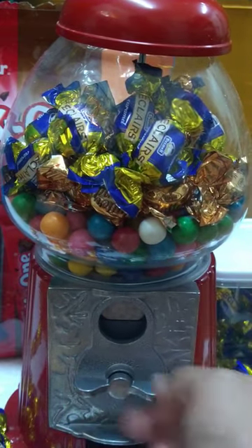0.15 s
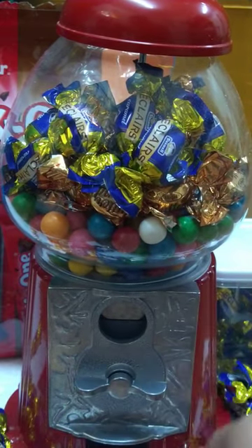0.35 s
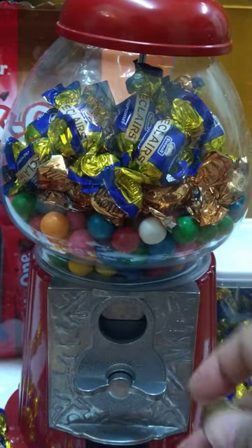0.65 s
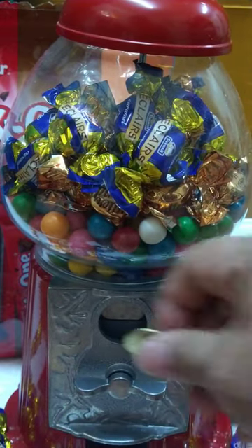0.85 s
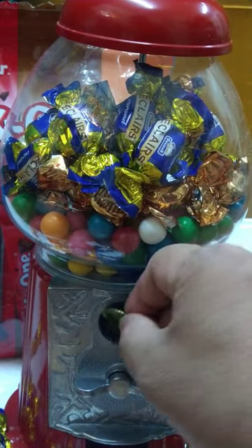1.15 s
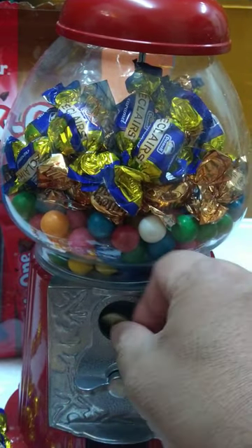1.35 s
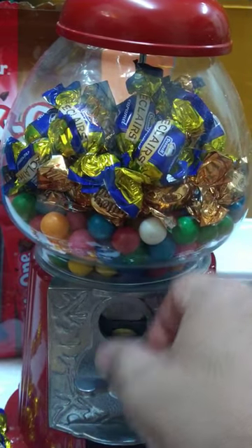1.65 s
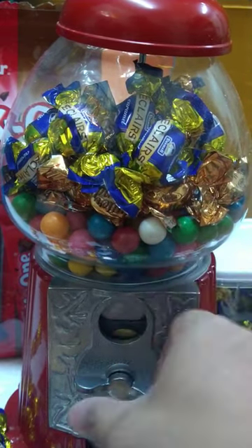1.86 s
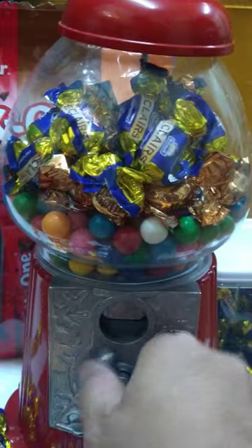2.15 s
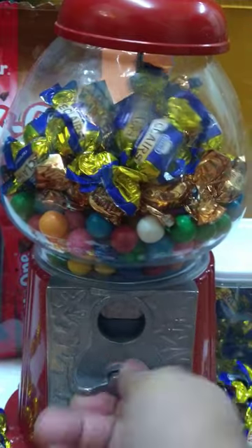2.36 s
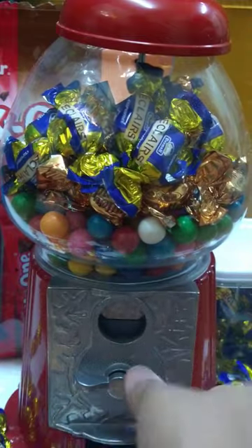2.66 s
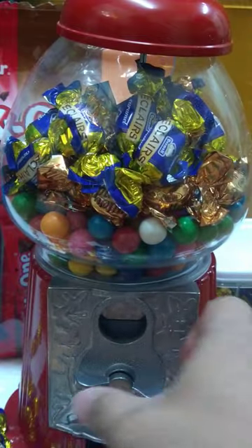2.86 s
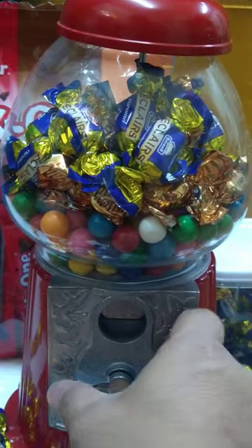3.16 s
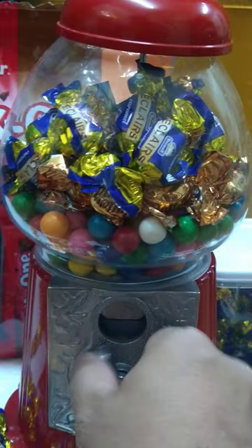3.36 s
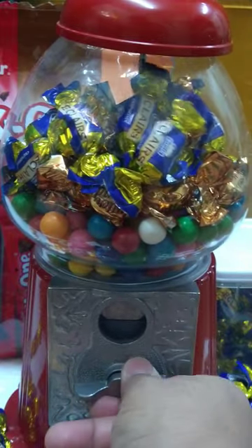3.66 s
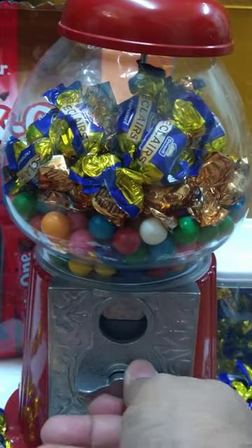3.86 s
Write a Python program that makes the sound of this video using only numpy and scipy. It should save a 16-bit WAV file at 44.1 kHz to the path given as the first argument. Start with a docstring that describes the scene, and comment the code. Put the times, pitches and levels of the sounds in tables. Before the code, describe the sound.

A gumball machine, close in a quiet room with low ventilation rumble and faint hiss. A hard metal clack opens at 0 s, then near quiet. Faint coin touches from 1.3 s become a bright scrape at 1.55; light ticks follow. Dense ratcheting clacks and grinding run 2.35-2.7, a short squeak at 2.8, sweets clattering 2.94-3.15, more clacks 3.4-3.7, then the coin drops at 3.8 with quickening, fading bounces.

```python
"""A hard metal clack over low ventilation rumble and faint hiss: a gumball machine, close by in a quiet room.
A coin scrapes into the slot and the knob is turned twice; pawl and wheel clack, sweets tumble on the globe.
At the end the coin falls into the base and bounces to rest. Contacts are filtered noise bursts with dying
modes, the grind is many tiny slips and the squeaks are rough two-harmonic chirps, all with a short room tail.
Two microphones hear the bass much alike and the treble differently."""
import sys
import numpy as np
from scipy import signal
from scipy.fft import rfft, irfft
from scipy.io import wavfile
from scipy.ndimage import uniform_filter1d

SR = 44100
rng = np.random.default_rng(int(sys.argv[2]) if len(sys.argv) > 2 else 0)


def int16_out(signal):
    """Quantize to a 16-bit WAV file."""
    q = np.round(np.clip(np.atleast_2d(signal).T, -1, 1) * 32767)
    wavfile.write(sys.argv[1], SR, q.astype(np.int16))


N = 176400


def amp(db):
    """Decibels to gain."""
    return 10 ** (np.asarray(db) / 20)


def evened(x):
    """Scales to rms 1."""
    return x / np.sqrt(np.mean(x ** 2) + 1e-20)


def read(points, hz):
    """Reads a table on a log-frequency axis."""
    f, value = np.transpose(points)
    return np.interp(np.log(hz + 1), np.log(f + 1), value)


def level_curve(points):
    """Gain over the whole scene, from a table of times and levels."""
    return amp(np.interp(np.arange(N) / SR, *np.transpose(points)))


def dying(t, t60):
    """Falls 60 dB in t60 seconds."""
    return np.exp(-np.log(1000) * t / t60)


def add(mix, s, sound):
    """Mixes a stereo sound in at time s."""
    part = mix[:, max(round(s * SR), 0):][:, :sound.shape[1]]
    part += sound[:, :part.shape[1]]


def microphones(x, likeness):
    """Two microphones hear the two sides mixed more or less alike, depending on frequency."""
    a, b = rfft(x)
    c = np.clip(read(likeness, np.fft.rfftfreq(N, 1 / SR)), -1, 1)
    mid = (a + b) * np.sqrt(1 + c) / 2
    side = (a - b) * np.sqrt(1 - c) / 2
    return irfft(np.array([mid + side, mid - side]), N)


# Spectrum of the room's rumble and hiss, before its overall level: (frequency [Hz], density [dB per Hz])
AIR_COLOUR = [(35,-35),(55,-19.5),(75,-12),(92,-3),(116,2),(140,-13),(450,-17),(720,-24.5),(1900,-33.5),(4500,-44),(9000,-41),(16000,-54)]
# Likeness of the air at the two microphones: (frequency [Hz], likeness [-1 to 1])
AIR_LIKENESS = [(100,1),(400,0.35)]
AIR_DB, AIR_SWELL_DB = -51.5, .6  # level, and rms depth of its slow swell


def air():
    """Ventilation rumble with a slow swell, under faint hiss: shaped steady noise."""
    hz = np.fft.rfftfreq(N, 1 / SR)
    noise = irfft(rfft(rng.standard_normal((2, N))) * amp(read(AIR_COLOUR, hz)), N)
    swell = evened(irfft(rfft(rng.standard_normal(N)) * np.exp(-(hz / 4) ** 2), N))
    return amp(AIR_DB + AIR_SWELL_DB * swell) * evened(microphones(noise, AIR_LIKENESS))


# The stand rumbling under the hand: (time [s], level [dB])
STAND_LEVEL = [(1.299,-62),(2.7,-51.5)]
STAND_HZ = 90  # centre of the rumble


def stand():
    """The hand's pushing shakes the stand: a low band of noise, alike at both microphones."""
    hz = np.fft.rfftfreq(N, 1 / SR)
    band = np.exp(-2 * np.log2((hz + 1) / STAND_HZ) ** 2)
    return evened(irfft(rfft(rng.standard_normal(N)) * band, N)) * level_curve(STAND_LEVEL)


# Decay of the room around the machine: (frequency [Hz], t60 [s])
ROOM_T60 = [(200,0.66),(4000,0.15),(9000,0.17),(15000,.16)]
ROOM_DB, ROOM_RISE_S = -11.5, 0.0048


def room(x):
    """A short diffuse tail: noise whose bass outlasts its treble."""
    hz, t, z = signal.stft(rng.standard_normal((2, SR // 2)), SR, nperseg=256)
    tail = signal.istft(z * dying(t, read(ROOM_T60, hz)[:, None]), SR)[1]
    tail = tail * np.minimum(np.arange(tail.shape[1]) / SR / ROOM_RISE_S, 1) ** 2
    return amp(ROOM_DB) * signal.fftconvolve(x, tail / np.linalg.norm(tail[0]), axes=1)[:, :N]


RIPPLE_DB, RIPPLE_WIDTH_HZ = 3.6, 220


def spot(size=2048):
    """The short resonances favoured by one point of contact, in dB over frequency."""
    lag = np.arange(size) / SR
    echoes = rng.standard_normal(size) * lag * np.exp(-(lag * RIPPLE_WIDTH_HZ * 2) ** 2)
    return RIPPLE_DB * evened(np.fft.fft(echoes).real)


BASS_SHELF_HZ, TREBLE_SHELF_HZ = 2900, 9000


def bass_shelf(hz):
    """Share of a bass boost or cut that reaches each frequency."""
    return 1 / (1 + (hz / BASS_SHELF_HZ) ** 3)


def coloured(x, colour, bass_db=0, treble_db=0, ripple=0, size=2048):
    """Causal filter of unit power with a spectrum, two shelves and a ripple of resonances."""
    hz = abs(np.fft.fftfreq(size, 1 / SR))
    treble_shelf = 1 - 1 / (1 + (hz / TREBLE_SHELF_HZ) ** 4)
    gain = evened(amp(read(colour, hz) + ripple + bass_db * bass_shelf(hz) + treble_db * treble_shelf))
    # Minimum phase puts the energy at the very start of the sound
    minimum_phase = np.exp(np.conj(signal.hilbert(np.log(gain + 1e-6))))
    taps = np.fft.ifft(minimum_phase).real[:size // 2]
    return signal.fftconvolve(x, taps[None], axes=1)[:, :x.shape[1]]


RING_SPREAD_DB = 4.5  # random spread of each mode's level at each microphone
FAVOUR_DB, FAVOUR_WIDTH_HZ = 9, 150  # a point of contact can drive the modes near one frequency harder
DETUNE_SHARE = .007  # the load on the parts shifts the modes from blow to blow


def ring(modes, t60, t, bass_db=0, favoured_hz=0):
    """Dying modes, excited a little differently by each blow and heard differently on each side."""
    hz, db = np.transpose(modes)[:, :, None]
    shape = (2, len(modes))
    phase = np.exp(2j * np.pi * rng.random(shape))
    size = amp(RING_SPREAD_DB * rng.standard_normal(shape)) * phase
    favour = FAVOUR_DB * np.exp(-((hz - favoured_hz) / FAVOUR_WIDTH_HZ) ** 2)
    db = db + bass_db * bass_shelf(hz) + favour
    hz = hz * (1 + DETUNE_SHARE * rng.standard_normal(hz.shape))
    return (size @ (amp(db) * np.exp((2j * np.pi * hz - np.log(1000) / t60) * t))).real


GRIT_DB, GRIT_HZ, GRIT_START_S = 1.6, 400, .012  # rms depth, fastest change, time to full depth


def chatter(t):
    """Loose parts make and break contact, so the tail of a blow is uneven."""
    slow = np.fft.rfftfreq(len(t), 1 / SR) < GRIT_HZ
    grit = irfft(rfft(rng.standard_normal(len(t))) * slow, len(t))
    return amp(GRIT_DB * evened(grit) * np.minimum(t / GRIT_START_S, 1))


# A contact swells, dies fast and leaves a short rattle; all but the rise are stretched by "length"
RISE_S, HOLD_S, CRACK_T60_S, RATTLE_T60_S, RATTLE_DB = .0026, 0.0034, 0.023, 0.088, -2
BRIGHT_DB_PER_DB = 0.64  # softer blows have less treble than the hardest of their kind
TREBLE_PER_BASS = -0.24  # a blow with less bass is also brighter


def strikes(rows, colour, modes, t60, ring_db, length, alike, favoured_hz=0):
    """Hard contacts: a crack of dense resonances, partly the same each time, and a few longer modes."""
    out, t = np.zeros((2, N)), np.arange(SR // 5) / SR
    rise = np.minimum(t / RISE_S, 1) ** 2
    crack_fall = dying(np.maximum(t / length - HOLD_S, 0), CRACK_T60_S)
    rattle_fall = amp(RATTLE_DB) * dying(t / length, RATTLE_T60_S)
    envelope = rise * np.hypot(crack_fall, rattle_fall)
    shared = rng.standard_normal((2, len(t)))
    hardest = max(row[1] for row in rows)

    def blow(db, bass_db=0, hz=favoured_hz):
        """One contact, from its level, bass and favoured frequency."""
        dense = np.sqrt(alike) * shared + np.sqrt(1 - alike) * rng.standard_normal(shared.shape)
        treble_db = BRIGHT_DB_PER_DB * (db - hardest) + TREBLE_PER_BASS * bass_db
        ripple = np.sqrt(1 - alike) * spot()
        crack = coloured(dense * envelope * chatter(t), colour, bass_db, treble_db, ripple)
        return amp(db) * (crack + amp(ring_db) * rise * ring(modes, t60, t, bass_db, hz))

    for s, *contact in rows:
        add(out, s - RISE_S / 2, blow(*contact))
    return out


# Ringing of the cast housing, shared by the grind and most contacts: (frequency [Hz], level [dB])
HOUSING = [(1610,-23),(1960,-16),(2600,-16),(2855,-18.5),(3540,-18.5),(3895,-21),(4160,-19.5),(4745,-16),(5615,-13),(6320,-21),(7235,-16),(8175,-19),(9925,-23.5)]
HOUSING_T60_S = 0.054
# Level of the rubbing as the knob is handled and the wheel grinds round: (time [s], level [dB])
GRIND_LEVEL = [(.05,-55.5),(.25,-58),(.32,-64),(1.44,-78),(1.53,-55.5),(1.7,-63.5),(2.15,-65.5),(2.28,-41.5),(2.345,-39.5),(2.75,-42),(2.79,-58.5),(2.92,-65),(3.059,-30),(3.19,-55),(3.388,-61),(3.46,-45),(3.7,-42.5),(3.8,-66)]
# Colour of the rubbing, also used in the squeaks: (frequency [Hz], density [dB per Hz])
GRIND_COLOUR = [(100,-33),(300,6),(600,-7.5),(1900,-1),(8000,-4.5),(11000,-9.5),(16000,-33.5)]
SLIPS_PER_S, SLIP_SPREAD_DB = 540, 3.5  # over all points together


def grinding(points=6):
    """Tiny slips of the wheel under the sweets, at several points of the housing."""
    t, sound = np.arange(SR // 10) / SR, 0
    for _ in range(points):
        size = amp(SLIP_SPREAD_DB * np.minimum(rng.exponential(1, N), 3))
        slips = (rng.random(N) < SLIPS_PER_S / points / SR) * size * rng.choice([-1, 1], N)
        burst = rng.standard_normal((2, len(t))) * np.exp(-t / 0.0046)
        grain = coloured(burst, GRIND_COLOUR, ripple=spot())
        grain = grain + amp(-3.5) * ring(HOUSING, HOUSING_T60_S, t, bass_db=17)
        sound = sound + signal.fftconvolve(slips[None], grain, axes=1)[:, :N]
    return evened(sound) * level_curve(GRIND_LEVEL)


# Hollow knocks of the base: (time [s], frequency [Hz], level [dB], t60 [s])
KNOCKS = [(2.592, 302, -31.5, 0.078), (2.9435, 754, -26.5, 0.016)]


def base_knocks():
    """Hollow knocks of the base: single dying sines, before the room the same on both sides."""
    out, t = np.zeros((2, N)), np.arange(SR // 8) / SR
    for s, hz, db, t60 in KNOCKS:
        envelope = amp(db) * np.minimum(t / 0.0037, 1) * dying(t, t60)
        add(out, s, np.ones((2, 1)) * envelope * np.sin(2 * np.pi * hz * t))
    return out


# Short squeaks of the turning shaft: (time [s], level [dB])
SQUEAKS = [(2.799,-33),(2.819,-29.5),(2.845,-24.5),(2.868,-36.5)]
SQUEAK_HZ, SQUEAK_WOBBLE_HZ = 1989, 94  # fundamental, and rms wander of its pitch
SQUEAK_S, SQUEAK_LOW_DB = 0.014, -4  # swell peaks at half this time; fundamental against second harmonic


def shaft_squeaks():
    """Rough stick-slip chirps of two harmonics with a little noise."""
    out, t = np.zeros((2, N)), np.arange(SR // 8) / SR
    swell = t / SQUEAK_S * 2 * np.exp(.5 - 2 * (t / SQUEAK_S) ** 2)
    for s, db in SQUEAKS:
        wobble = evened(uniform_filter1d(rng.standard_normal(len(t)), size=14))
        hz = SQUEAK_HZ + SQUEAK_WOBBLE_HZ * wobble
        turn = 2 * np.pi * (np.cumsum(hz) / SR + rng.random((2, 1)))
        tone = amp(SQUEAK_LOW_DB) * np.sin(turn) + np.sin(2 * turn)
        rub = amp(-8.0) * coloured(rng.standard_normal((2, len(t))), GRIND_COLOUR)
        add(out, s, amp(db) * swell * (tone + rub))
    return out


# Light ticks of knob and seated coin: (time [s], level [dB])
TICKS = [(1.7149,-39),(1.779,-51),(1.8516,-42.5),(1.924,-45.5),(1.9843,-41),(2.113,-46.5),(2.2577,-34.5)]
# Colour of the ticks: (frequency [Hz], density [dB per Hz])
TICK_COLOUR = [(200,0),(2500,-1),(4400,11),(5500,-3),(9000,-2.5),(16000,-30)]


def light_ticks():
    """Light contacts of knob and coin: short cracks with little housing ring."""
    return strikes(TICKS, TICK_COLOUR, HOUSING, HOUSING_T60_S, ring_db=-9.0, length=0.66, alike=0.2)


# The coin touching and sliding down the slot: (time [s], level [dB])
SLOT = [(1.3313,-40),(1.3801,-45.5),(1.429,-41.5),(1.5443,-25.5),(1.5523,-21.5),(1.5697,-22),(1.583,-21.5),(1.596,-25),(1.623,-32)]
# Colour of the sliding coin: (frequency [Hz], density [dB per Hz])
SLOT_COLOUR = [(1000,-15),(1900,2),(2500,0),(5200,6),(10000,1),(14500,-10),(16000,-48)]


def coin_in_slot():
    """The coin scrapes down the slot: bright contacts that favour one housing mode."""
    return strikes(SLOT, SLOT_COLOUR, HOUSING, HOUSING_T60_S,
                   ring_db=1.5, length=0.86, alike=0.54, favoured_hz=1960)


# Sweets knocking against wheel and globe: (time [s], level [dB], bass [dB])
SWEETS = [(2.9425,-11.5,4.5),(2.95,-46,-11),(2.9722,-13.5,-14.5),(2.987,-28.5,13),(3.0194,-20.5,-1),(3.0444,-18,-6),(3.058,-19.5,-3),(3.075,-19.5,-1.5),(3.0997,-29,-10),(3.1107,-22,-4),(3.121,-22,-3.5),(3.1446,-24,-3.5)]
# Colour of the sweets: (frequency [Hz], density [dB per Hz])
SWEET_COLOUR = [(60,-32),(300,-7),(450,-13),(700,0),(1000,-8.5),(1500,3.5),(3400,-2.5),(6000,-0.5),(10500,1.5),(13000,-7),(16000,-28)]


def sweets():
    """Sweets tumble against wheel and globe: longer cracks that set the housing ringing."""
    return strikes(SWEETS, SWEET_COLOUR, HOUSING, HOUSING_T60_S, ring_db=8.5, length=1.33, alike=0.36)


# The coin bouncing in the base: (time [s], level [dB])
BOUNCES = [(3.8075,-10),(3.8603,-13.5),(3.8962,-19.5),(3.9208,-24),(3.9408,-24),(3.957,-27),(3.971,-28)]
# Colour of the falling coin: (frequency [Hz], density [dB per Hz])
BOUNCE_COLOUR = [(1100,-20.5),(1900,-11.5),(3500,-14),(5700,3),(7200,2.5),(8800,1.5),(14500,-14.5),(16000,-58)]
# Ringing of the coin itself: (frequency [Hz], level [dB])
COIN = [(2584,-20.5),(4750,-42),(5674,-25),(7241,-15.5)]


def coin_bounces():
    """The coin bounces to rest: bright cracks and the coin's own modes."""
    return strikes(BOUNCES, BOUNCE_COLOUR, COIN, 0.072, ring_db=5.5, length=0.67, alike=0.6)


# Clacks of knob, pawl and wheel: (time [s], level [dB], bass [dB], favoured housing mode [Hz])
CLACKS = [(.0108,-11,-5.5,3540),(.051,-31,-9.5,2600),(.237,-47.5,12.5,1960),(2.028,-53,8,1960),(2.1995,-29.5,2,1960),(2.212,-34,4.5,1960),
          (2.348,-16,4.5,1960),(2.3625,-16,-2.5,1610),(2.375,-21,-12,1610),(2.3935,-24.5,-44,8175),(2.4135,-9,1.5,3540),(2.422,-19,-1,2600),
          (2.4602,-12.5,-4.5,2600),(2.4802,-11,-9.5,4160),(2.5008,-12,-.5,4160),(2.537,-15,-12.5,1960),(2.554,-26.5,-1,7235),(2.565,-18,-15,7235),
          (2.5845,-22.5,4.5,2600),(2.5924,-16.5,-7.5,2600),(2.611,-22,-3.5,1960),(2.6383,-19.5,0,2600),(2.653,-29.5,11,1610),(2.7006,-31.5,-4,2600),(2.8174,-24,5.5,1960),
          (3.4178,-12.5,-4.5,1960),(3.432,-19.5,-17,6320),(3.4865,-12.5,-1,2600),(3.557,-20,-5,1960),(3.582,-24,1.5,3540),(3.656,-25.5,5.5,7235),(3.7048,-10.5,0,4745)]
# Colour of metal on metal: (frequency [Hz], density [dB per Hz])
METAL_COLOUR = [(50,-35.5),(300,-12),(550,-22.5),(1000,-12),(1450,-6),(3000,-6),(5000,-2.5),(7500,1),(10500,-1),(14500,-10.5),(16000,-22)]


def clacks():
    """Knob, pawl and wheel strike the cast housing, each blow favouring one mode."""
    return strikes(CLACKS, METAL_COLOUR, HOUSING, HOUSING_T60_S, ring_db=3.0, length=1., alike=0.28)


# Likeness of the machine and its room tail at the microphones: (frequency [Hz], likeness [-1 to 1])
MACHINE_LIKENESS = [(200,.8),(700,0.5),(1600,0.032)]


def scene():
    """The machine close to the microphones, in its quiet room."""
    machine = grinding() + base_knocks() + shaft_squeaks() + light_ticks()
    machine = machine + coin_in_slot() + sweets() + coin_bounces() + clacks()
    return air() + stand() + microphones(machine + room(machine), MACHINE_LIKENESS)


def record(dry):
    """Peaks are rounded near full scale; then the treble is cut off at 16 kHz."""
    low_pass = signal.firwin(255, 16000, window=("kaiser", 8), fs=SR)
    return signal.oaconvolve(np.tanh(dry), low_pass[None], "same")


dry = scene()
out = record(dry)
int16_out(out)
```